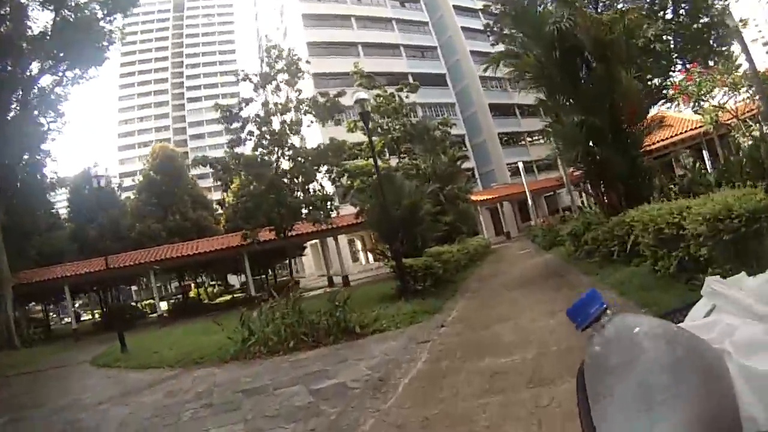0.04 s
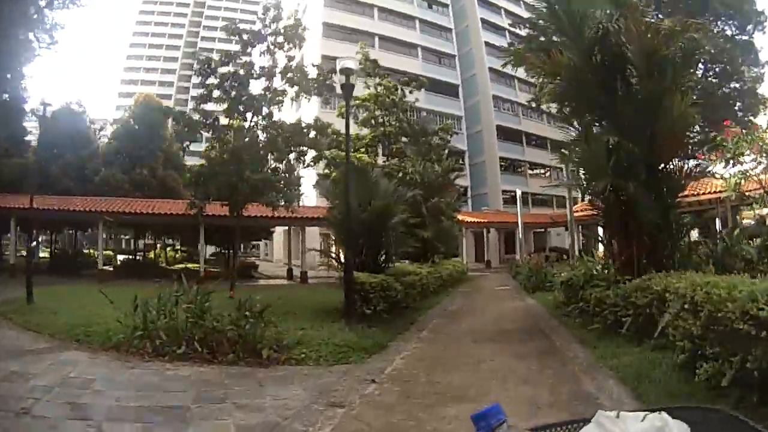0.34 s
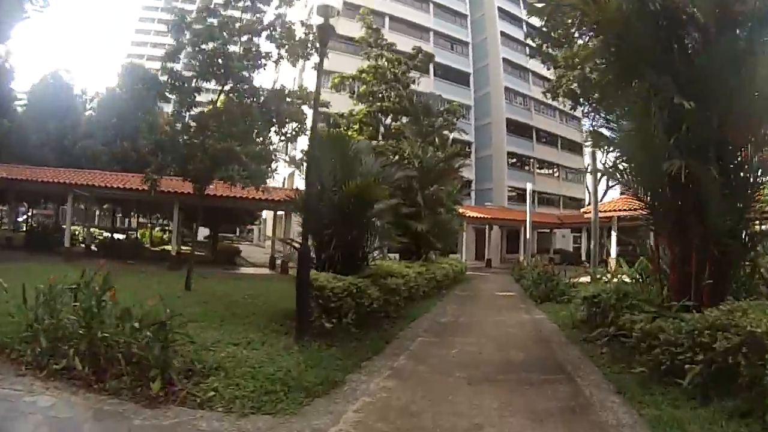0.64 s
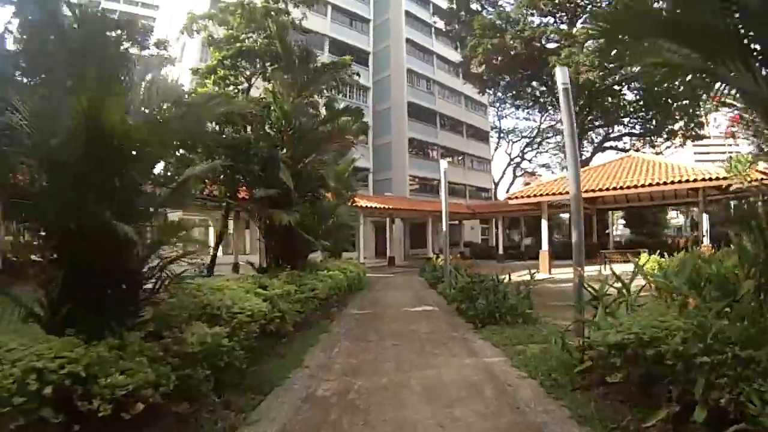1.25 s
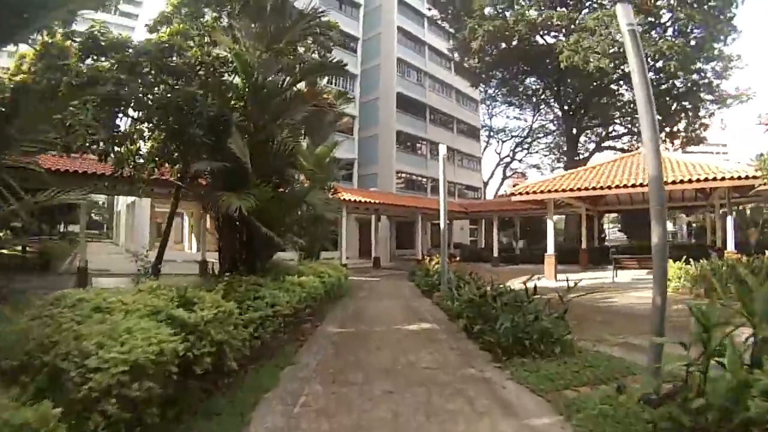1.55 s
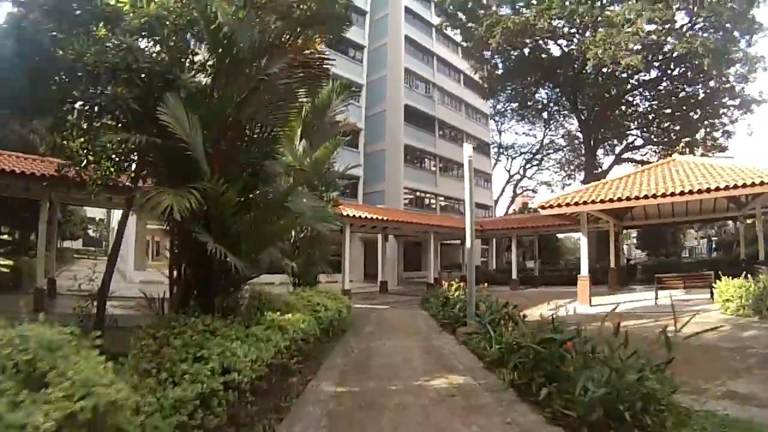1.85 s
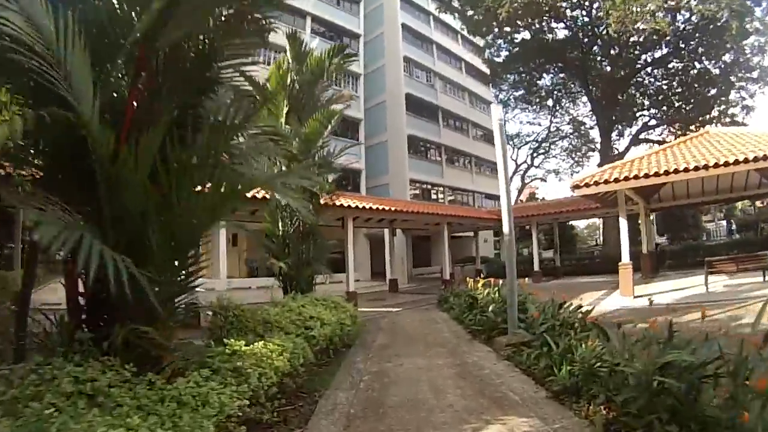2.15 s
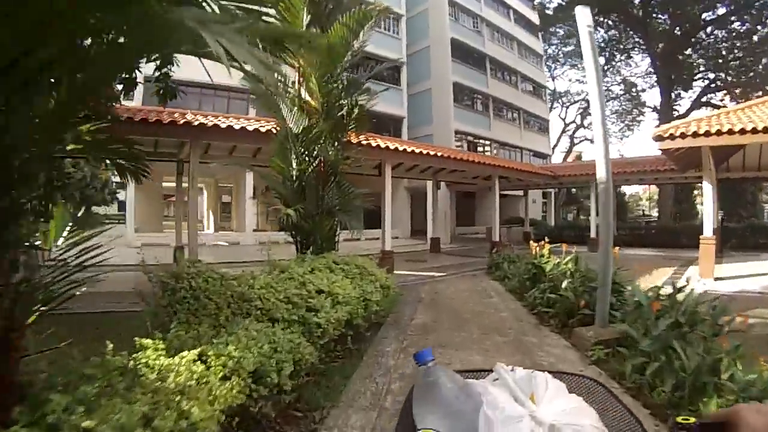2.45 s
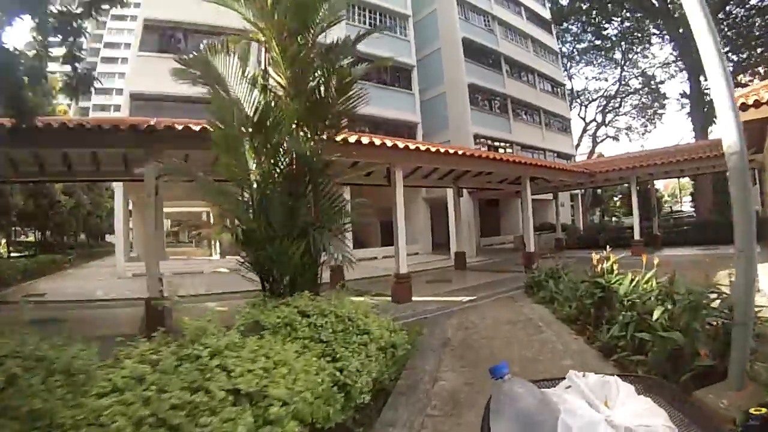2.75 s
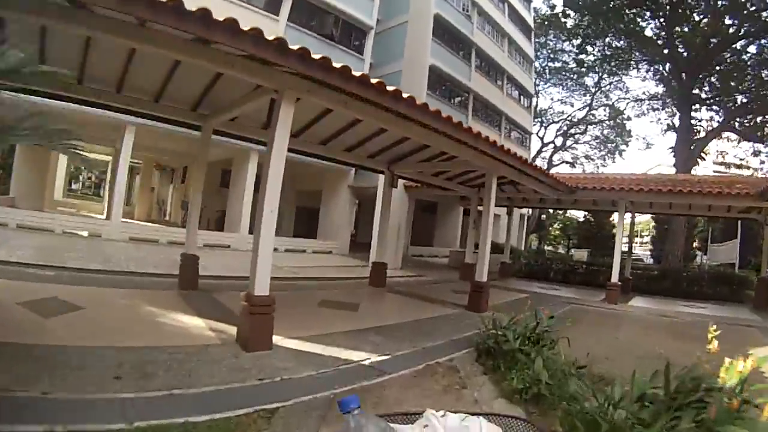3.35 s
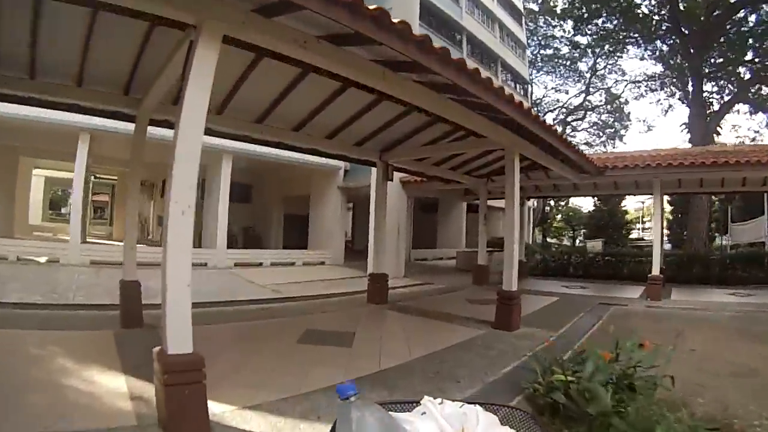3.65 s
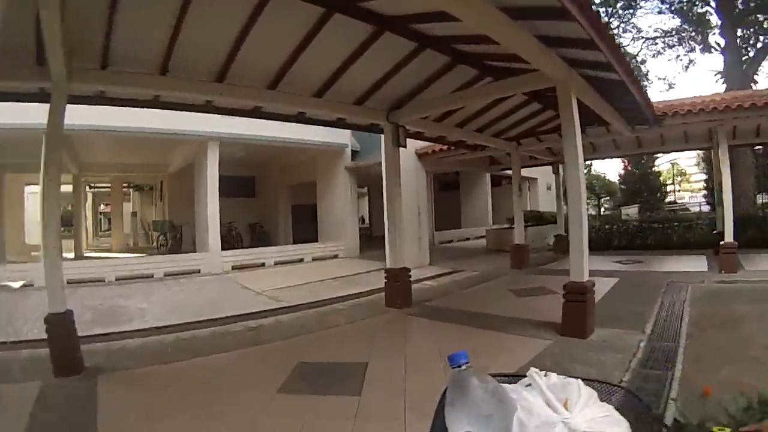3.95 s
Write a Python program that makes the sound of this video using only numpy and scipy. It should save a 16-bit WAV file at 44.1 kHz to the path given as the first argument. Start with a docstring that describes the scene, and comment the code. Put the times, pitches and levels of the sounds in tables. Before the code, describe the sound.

A bicycle bell rings brightly and fades over faint tyre noise and wheel ticks.

```python
"""A bicycle bell rings out, flicked twice in quick succession as the bicycle rolls along a paved garden path.
Three modes of the dome decay as pure partials that waver as the bicycle moves, and the surrounding
buildings return faint Doppler-shifted echoes. The flick jolts the handlebar, a wheel ticks, tyres and
light wind hum below, and at the end friction excites a harsh metallic scrape."""
import sys
import numpy as np
from scipy import signal
from scipy.fft import rfft, irfft
from scipy.io import wavfile

SR = 44100
rng = np.random.default_rng(int(sys.argv[2]) if len(sys.argv) > 2 else 0)


def to_wav(s):
    """Save 16-bit WAV."""
    ch = np.atleast_2d(s).T  # columns
    pcm = np.round(np.clip(ch, -1, 1) * 32767)  # PCM
    wavfile.write(sys.argv[1], SR, pcm.astype(np.int16))


N = 176400
T = np.arange(N) / SR
FREQS = np.fft.rfftfreq(N, 1 / SR)


def amp(db):
    """Amplitude ratio of a level in decibels."""
    return 10 ** (np.asarray(db) / 20)


def unit(x):
    """Normalisation to rms 1."""
    return x / np.sqrt(np.mean(x ** 2) + 1e-20)


def curve(points):
    """Linear interpolation between (time, value) points."""
    return np.interp(T, *np.transpose(points))


def noise(spectrum):
    """Spectrally shaped Gaussian noise of rms 1."""
    hz, db = np.transpose(spectrum)
    gain = amp(np.interp(np.log(FREQS + 1), np.log(hz), db))
    return unit(irfft(rfft(rng.standard_normal(N)) * gain, N))


def drift(rate_hz):
    """Slow random modulation: low-pass noise of rms 1."""
    return unit(irfft(rfft(rng.standard_normal(N)) * np.exp(-(FREQS / rate_hz) ** 2), N))


def onset(age, rise_s):
    """Raised-cosine attack from 0 to 1."""
    return np.sin(np.pi / 2 * np.clip(age / rise_s, 0, 1)) ** 2


def decay(age, t60):
    """Exponential damping by 60 dB in t60 seconds, silent before age zero."""
    return (age >= 0) * np.exp(-np.log(1000) * np.maximum(age, 0) / t60)


# spectrum of tyres on paving and distant surroundings (frequency [Hz], relative density [dB])
TYRE_SPECTRUM = [(20, -0.5), (100, 0), (170, -1), (260, -3.5), (450, -8.5), (800, -11.5), (1200, -12),
                 (1400, -3.5), (1550, -3.5), (1850, -12.5), (2600, -14), (3300, -19), (4800, -22.5),
                 (7000, -25.5), (10000, -32), (12500, -35), (13500, -42), (15000, -37.5)]
# rolling envelope (time [s], level [dB])
TYRE_LEVEL = [(0, -54.5), (.6, -55.5), (1.3, -55.5), (2, -56), (2.6, -55.5), (4, -56)]
def tyres():
    """Rolling noise: tyres on paving radiate a broad spectrum whose level flutters slightly."""
    return noise(TYRE_SPECTRUM) * amp(curve(TYRE_LEVEL) + 0.39 * drift(rate_hz=14))


# wind spectrum (frequency [Hz], relative density [dB])
WIND_SPECTRUM = [(8, -2.5), (20, 1), (33, -4), (55, -6.5), (80, -11), (130, -20), (250, -45), (1000, -70.5)]
# wind envelope (time [s], level [dB])
WIND_LEVEL = [(0, -43.5), (.7, -49), (1.3, -50), (2.0, -54), (2.7, -44), (3.2, -47.5), (4, -47.5)]
def wind(gust_db=4.5):
    """Turbulence: pressure fluctuations at the microphone make a gusty rumble."""
    rumble = noise(WIND_SPECTRUM) * amp(gust_db * drift(rate_hz=4.1))
    return unit(rumble) * amp(curve(WIND_LEVEL))


# metal resonances (frequency [Hz], bandwidth [Hz], relative level [dB])
SCRAPE_MODES = [(1400, 130, 2.5), (2700, 240, -2), (3530, 120, -2.5), (4780, 70, -6.5), (6550, 270, -12),
                (7650, 530, -7)]
# scrape envelope (time [s], level [dB])
SCRAPE_LEVEL = [(3.967, -77), (3.971, -45.5), (3.985, -43), (3.993, -47.5), (4.0, -39)]
def scrape(cutoff_hz=8640):
    """Forced vibration: friction, probably at a brake, drives metal resonances with noise."""
    metal = np.zeros(N)
    for hz, width, db in SCRAPE_MODES:
        pole = np.exp((-np.pi * width + 2j * np.pi * hz) / SR)
        metal += amp(db) * unit(signal.lfilter([1], [1, -pole], rng.standard_normal(N)).real)
    metal = signal.sosfilt(signal.butter(6, cutoff_hz, fs=SR, output="sos"), metal)
    return unit(metal) * amp(curve(SCRAPE_LEVEL)) * (T > SCRAPE_LEVEL[0][0])


# ticks of the turning wheel (time [s], knock level [dB], rasp level [dB])
TICKS = [(0.295, -45, -50), (0.4952, -45, -49.5), (0.695, -49, -51.5), (0.888, -43, -54.5),
         (1.0878, -42.5, -47), (1.279, -50.5, -51), (2.276, -57.5, -57), (2.4666, -47.5, -53.5),
         (2.671, -48.5, -59)]
# hollow knock spectrum (frequency [Hz], relative density [dB])
KNOCK_SPECTRUM = [(300, -31), (1150, -46), (1420, 3), (1580, 7), (1800, -21), (2600, -32.5), (15000, -60)]
# rasp spectrum (frequency [Hz], relative density [dB])
RASP_SPECTRUM = [(300, -19), (1200, -9.5), (2050, 3), (2850, 1), (3400, -24.5), (5000, -18), (9000, -38),
                 (15000, -41)]
def wheel():
    """Periodic impact: in two spells, something catches about five times a second, knocking and rasping."""
    knock, rasp = np.zeros((2, N))
    for start, knock_db, rasp_db in TICKS:
        age = T - start
        snap = amp(-3.5) * decay(age, t60=0.023)  # first contact, above the rattle
        attack = onset(age, rise_s=0.0011) * (1 + snap)
        knock += amp(knock_db) * attack * decay(age, t60=0.084)
        rasp += amp(rasp_db) * attack * decay(age, t60=0.11)
    return knock * noise(KNOCK_SPECTRUM) + rasp * noise(RASP_SPECTRUM)


# handlebar jolts (time [s], level [dB], frequency [Hz], t60 [s])
JOLTS = [(.005, -30.5, 25.7, 0.88), (0.055, -21, 74, 0.086), (0.1158, -14.5, 80.9, 0.074),
         (0.1265, -12.5, 32.85, 0.16)]
def handlebar():
    """Structure-borne sound: low, damped oscillations of the handlebar reach the microphone."""
    out = np.zeros(N)
    for start, db, hz, t60 in JOLTS:
        age = T - start
        out += amp(db) * onset(age, rise_s=0.016) * decay(age, t60) * np.sin(2 * np.pi * hz * age)
    return out


def read_at(x, times):
    """Variable delay: x is oversampled and read at sliding times, which shifts its pitch."""
    fine = signal.resample_poly(x, up=8, down=1)
    return np.interp(times, np.linspace(0, N / SR, len(fine), endpoint=False), fine, right=0)


BICYCLE_M_PER_S, SOUND_M_PER_S = 5.5, 343
def far_echoes(x, delay_scale_s=0.16, count=30):
    """Diffuse reflection: each distant surface returns an echo, Doppler-shifted according to its bearing."""
    times = []
    for k, (lateness, jitter) in enumerate(rng.random((count, 2))):
        bearing_cosine = 0.76 * (2 * (k + jitter) / count - 1)
        shift = 2 * BICYCLE_M_PER_S / SOUND_M_PER_S * bearing_cosine
        times.append((T - delay_scale_s * (0.1 + lateness)) * (1 + shift))
    fade_in = np.clip(np.array(times) / delay_scale_s * 10, 0, 1)
    return np.sum(read_at(x, times) * fade_in, axis=0) / np.sqrt(count)


# echoes from things beside the path
# (start [s], end [s], level [dB], path shortening at start [m/s], path shortening at end [m/s])
REFLECTORS = [(.3, .62, -17, 1.6, 1.6), (.6, 1.0, -13, -.8, -3.4), (1.1, 1.4, -12, -2.1, -1.6),
              (1.12, 1.62, -9, 2.0, .5)]
def near_echoes(x, initial_delay_s=0.03):
    """Doppler effect: changing path lengths detune echoes that swell and fade, so the ring shimmers."""
    out = np.zeros(N)
    for start, end, db, first_speed, last_speed in REFLECTORS:
        progress = np.clip((T - start) / (end - start), 0, 1)
        speed = first_speed + (last_speed - first_speed) * progress
        delay = initial_delay_s - np.cumsum(speed) / SR / SOUND_M_PER_S
        out += amp(db) * np.sin(np.pi * progress) * read_at(x, T - delay)
    return out


# movements of the bell's lever (time [s], level [dB])
LEVER_MOVES = [(.055, -46), (.1, -45), (0.108, -39), (.116, -38), (0.123, -46)]
# lever spectrum (frequency [Hz], relative density [dB])
LEVER_SPECTRUM = [(300, -5), (1000, -26), (1450, 4), (2200, 9), (3000, -15.5), (5000, -17), (10000, -32.5),
                  (15000, -43)]
def lever():
    """Sliding friction: the lever rasps briefly as it moves and springs back."""
    envelope = sum(amp(db) * onset(T - start, rise_s=0.003) * decay(T - start, t60=0.056)
                   for start, db in LEVER_MOVES)
    return envelope * noise(LEVER_SPECTRUM)


# click spectrum (frequency [Hz], relative density [dB])
CLICK_SPECTRUM = [(300, -25), (1200, -22), (2200, 2), (3500, -8), (5200, -2), (6900, 14), (8600, -13),
                  (12000, -9), (15000, -12.5)]
# hammer blows on the dome (time [s], strength [dB], extra gain of the top partial [dB])
STRIKES = [(-0.085, 2, -3), (0.1159, -1, 1)]
def hammer():
    """Impact transient: each blow on the dome makes a broadband click with a short tail."""
    envelope = np.zeros(N)
    for start, strength_db, _ in STRIKES:
        click = amp(-26.5) * decay(T - start, t60=0.012)
        tail = amp(-41.5) * decay(T - start, t60=0.035)
        envelope += amp(strength_db) * (click + tail)
    return envelope * noise(CLICK_SPECTRUM)


# dome modes (frequency [Hz], prompt level [dB], prompt t60 [s], lingering level [dB], lingering t60 [s])
DOME_MODES = [(2528, -46.5, 0.52, -38, 3.46), (6452.5, -23, 0.98, -34.5, 3.15),
              (11700, -25, 0.43, -57, 1.05)]
# wavering of the lowest partial (time [s], gain [dB])
LOW_WAVER = [(0, 5), (.1, 2.5), (.135, 6), (.2, 0.5), (.262, -9.5), (.33, 1.5), (.39, 1), (.44, 0),
             (.48, -16), (.5, -1.5), (.69, 1.5), (.77, -8.5), (.855, 3), (.985, -4), (1.09, 5.5),
             (1.22, -2.5), (1.28, 4), (1.34, -4), (1.5, -1.5), (1.68, 3), (1.74, -2), (1.82, 5)]
# wavering of the main partial (time [s], gain [dB])
MAIN_WAVER = [(0, -3.5), (.055, 2.5), (.097, -6), (.135, -1), (.163, 6.5), (.21, 5.5), (.245, -4.5),
              (.31, 4.5), (.372, -3.5), (.48, 3), (.52, -8), (.6, 2.5), (.67, -6.5), (.74, 5), (.805, -12),
              (.85, 3), (.985, -10.5), (1.08, 6), (1.17, -1), (1.5, -1)]
# wavering of the top partial (time [s], gain [dB])
TOP_WAVER = [(0, -1), (.08, 2), (.11, 2), (.125, 1.5), (.195, -8), (.24, 4.5), (.3, -5.5), (.34, 8),
             (.45, -3), (.58, 8)]
def bell(rise_s, beat_hz=7.42):
    """Free vibration: each blow restarts the dome's modes, which fade fast at first and then linger."""
    out = np.zeros(N)
    twin_hz = DOME_MODES[1][0] + beat_hz
    for start, strength_db, top_db in STRIKES:
        age = T - start
        # a weak, slightly sharp twin of the main mode slowly takes up energy and beats in the tail
        twin_envelope = amp(-45.5) * onset(age, rise_s=1.5) * decay(age, t60=3.6)
        ring = twin_envelope * np.sin(2 * np.pi * twin_hz * age)
        wavers = [curve(LOW_WAVER), curve(MAIN_WAVER), curve(TOP_WAVER) + top_db]
        for (hz, db, t60, linger_db, linger_t60), waver_db in zip(DOME_MODES, wavers):
            envelope = amp(db) * decay(age, t60) + amp(linger_db) * decay(age, linger_t60)
            ring += amp(waver_db) * envelope * np.sin(2 * np.pi * hz * age)
        out += (amp(strength_db) * ring - out) * onset(age, rise_s)  # the new ring replaces the old
    return out


def scene():
    """Superposition: the bell and its softer-edged echoes add to the sounds of riding."""
    softened = bell(rise_s=0.015)
    echoes = near_echoes(softened) + amp(-29.5) * far_echoes(softened)
    direct = bell(rise_s=0.0006) + hammer() + lever()
    riding = handlebar() + wheel() + scrape() + tyres() + wind()
    return (echoes + direct + riding)[None]


def record(dry):
    """Band limiting: a linear-phase low-pass removes the highest treble."""
    cutoff_hz = 15100
    lowpass = signal.firwin(401, cutoff_hz, window=("kaiser", 8), fs=SR)
    return signal.oaconvolve(dry, lowpass[None], "same")


dry = scene()
out = record(dry)
to_wav(out)
```